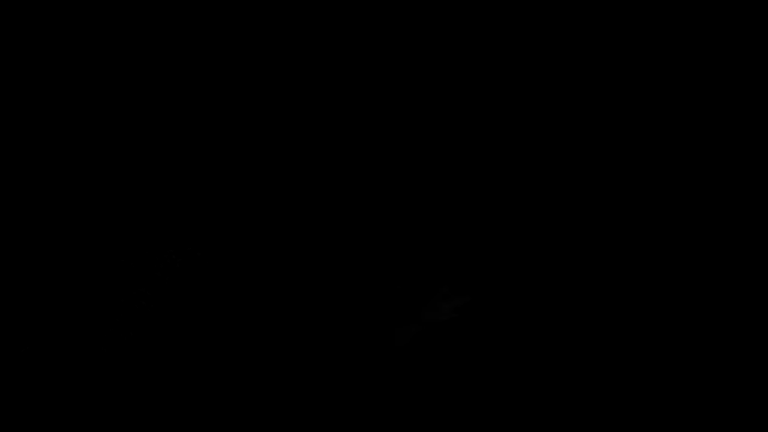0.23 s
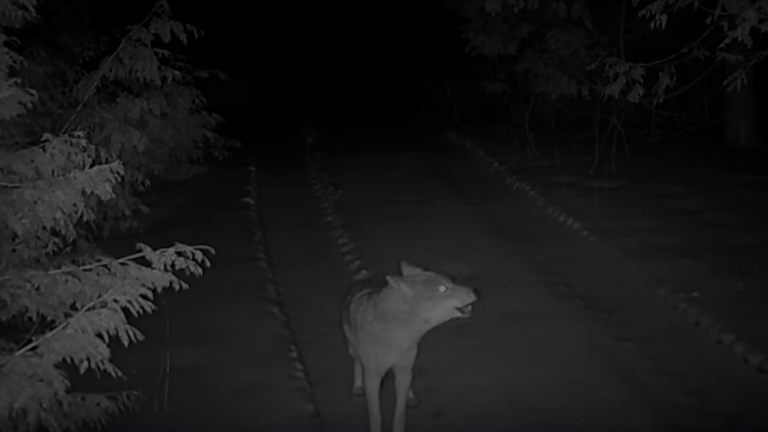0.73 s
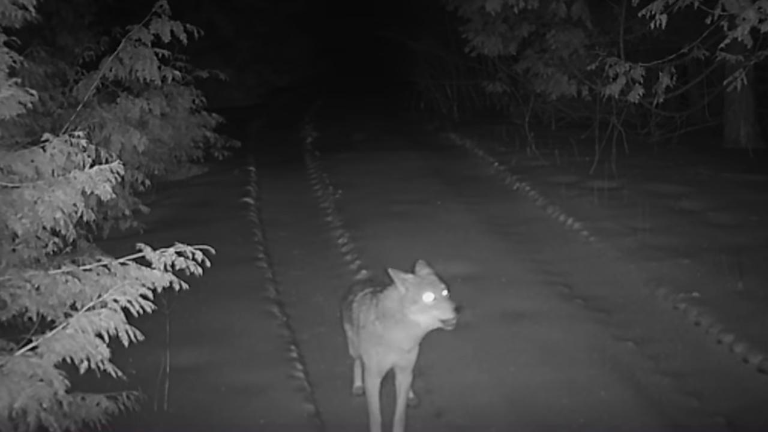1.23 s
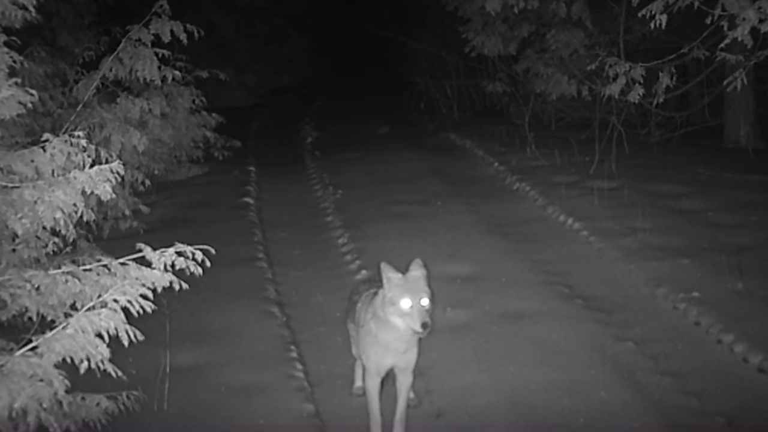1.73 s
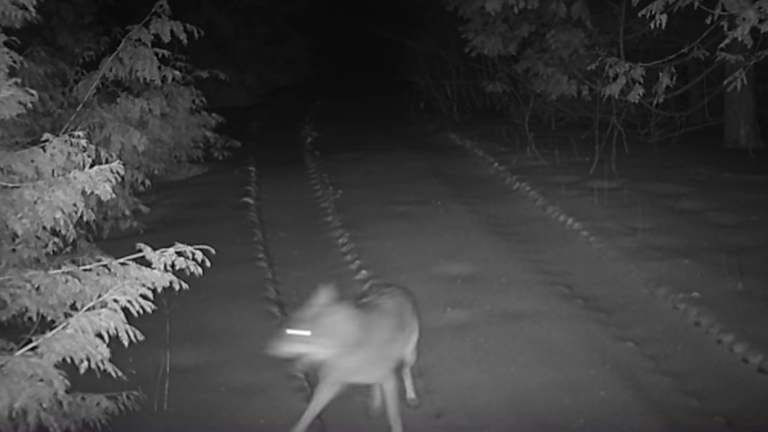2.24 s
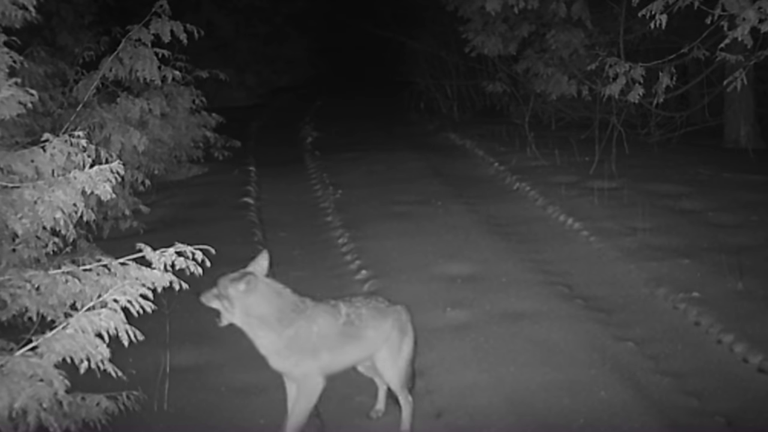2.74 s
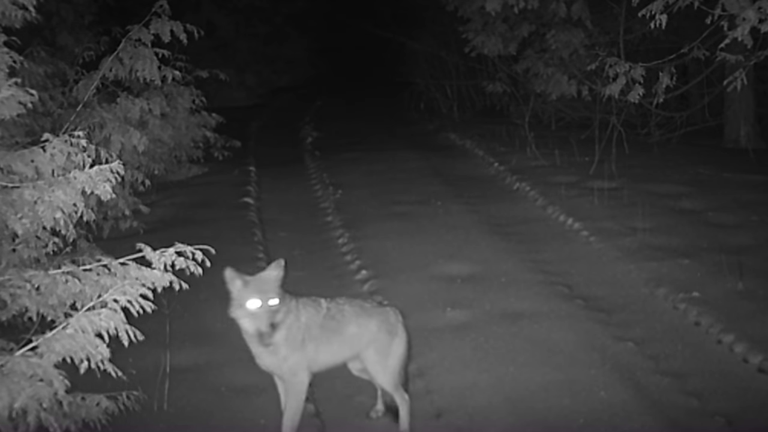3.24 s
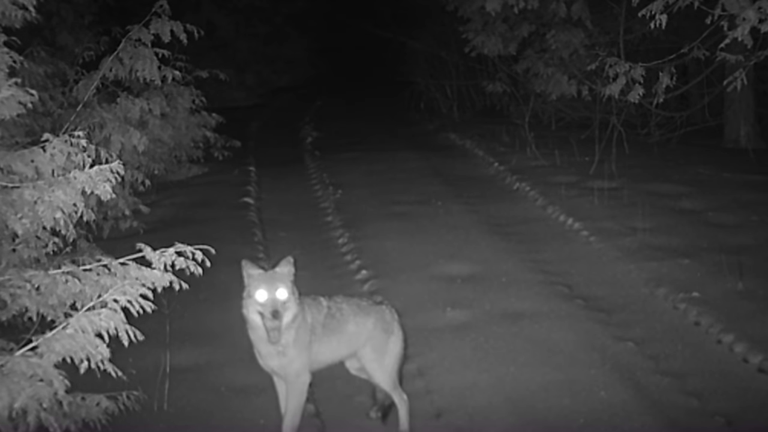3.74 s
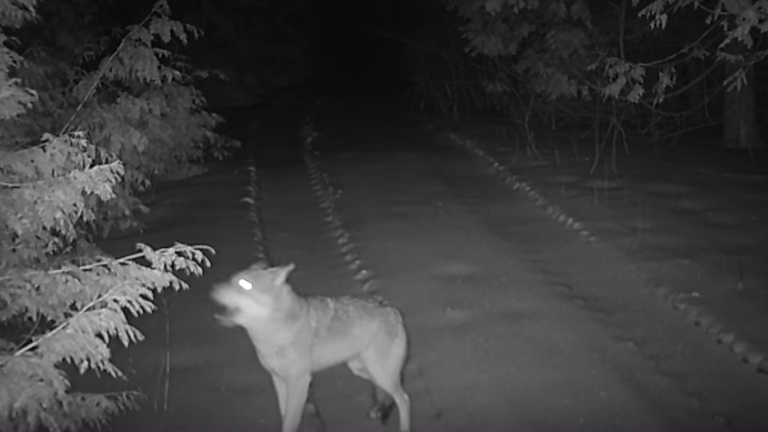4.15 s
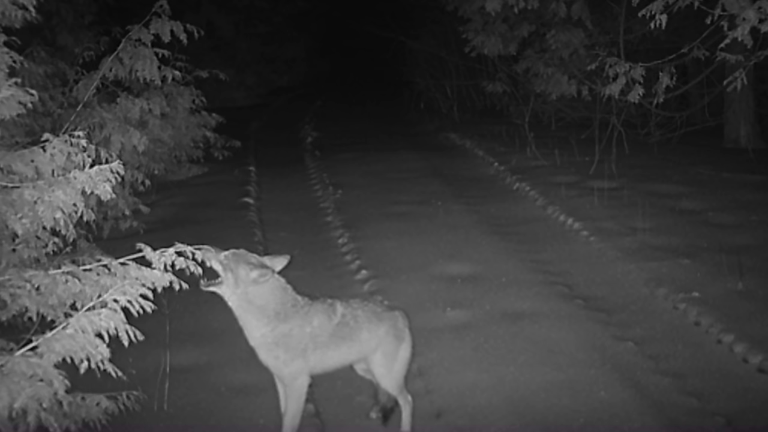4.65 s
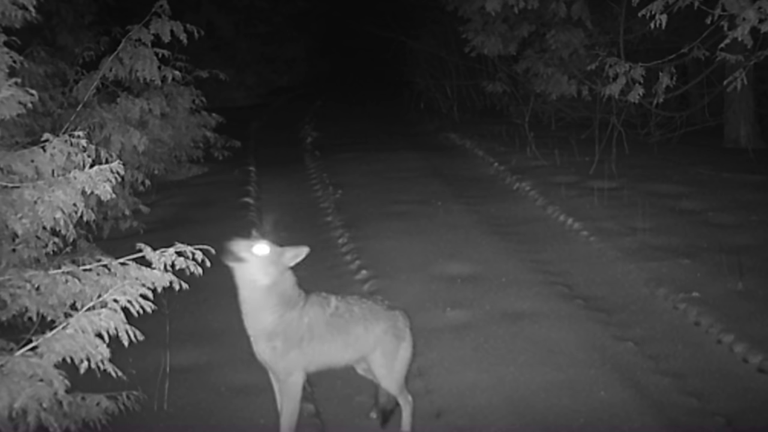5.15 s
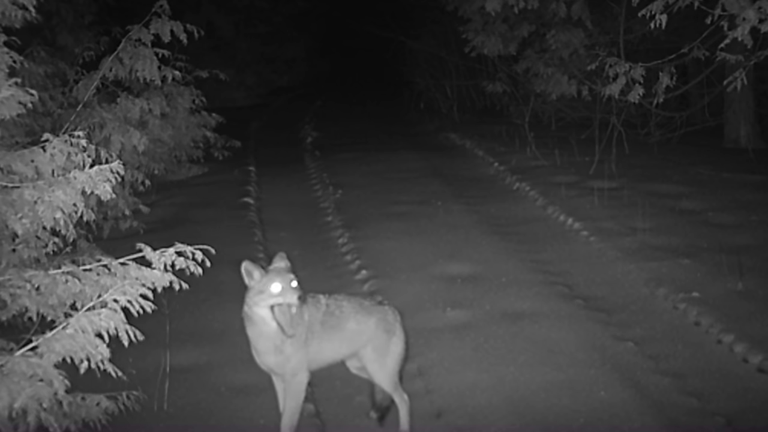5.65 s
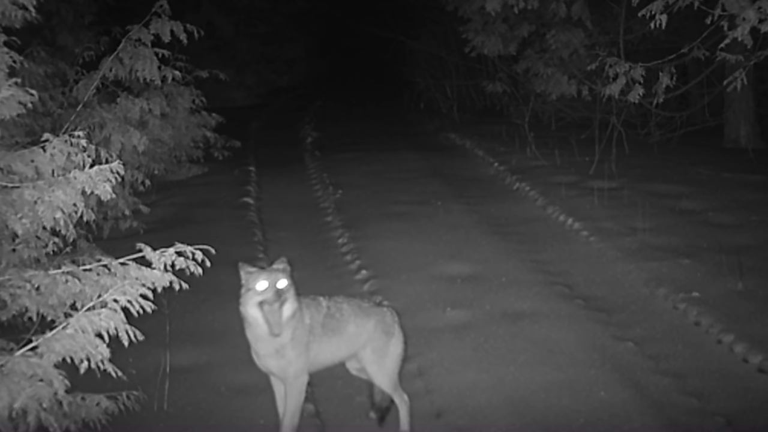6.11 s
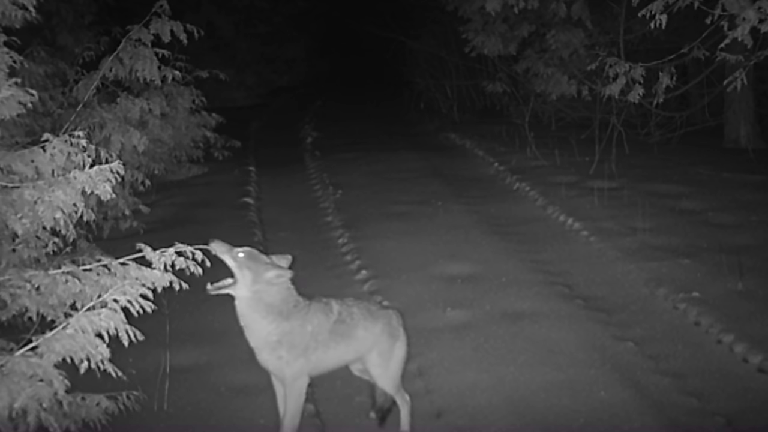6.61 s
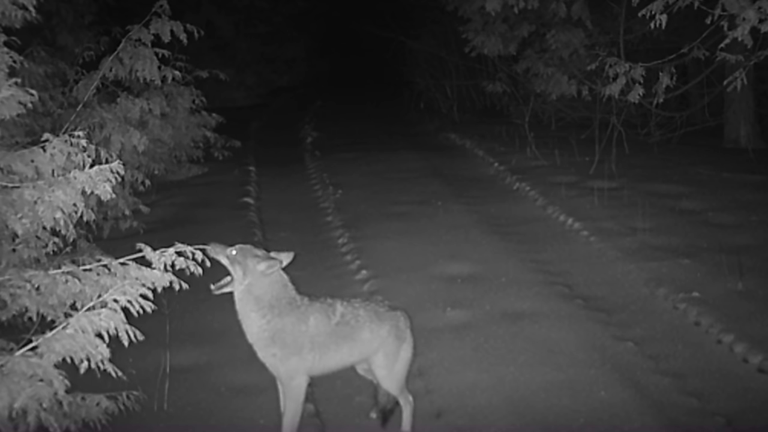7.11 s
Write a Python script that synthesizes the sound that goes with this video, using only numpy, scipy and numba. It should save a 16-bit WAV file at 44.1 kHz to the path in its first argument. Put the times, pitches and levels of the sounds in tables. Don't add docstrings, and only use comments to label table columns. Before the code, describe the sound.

Several coyotes call together outdoors, one only metres from a small bass-light microphone. Faint hiss and quiet moaning give way to long gliding howls and high whines, then yodels, sharp yips, a low bark and harsh shrieking cries that briefly distort. A hoarse far pack swells behind, trees scatter the voices briefly, and a few tiny dry twig ticks show between calls. The chorus is still loud at the close.

```python
import sys
import numpy as np
from scipy import signal
from scipy.fft import rfft, irfft, next_fast_len
from scipy.io import wavfile
from scipy.ndimage import uniform_filter1d
from numba import njit

SR = 44100
rng = np.random.default_rng(int(sys.argv[2]) if len(sys.argv) > 2 else 0)


def log_audio(samples):
    frames = np.atleast_2d(samples).T
    limited = np.clip(frames, -1, 1)
    pcm = np.round(limited * 32767).astype(np.int16)
    wavfile.write(sys.argv[1], SR, pcm)


def gain_from_db(level_db):
    decades = np.asarray(level_db, float) / 20
    return 10 ** decades


N = 325458


def level(x, db):
    return x * gain_from_db(db) / np.sqrt(np.mean(x ** 2))


def on_log(hz, table):
    table_hz, table_db = np.transpose(table)
    return np.interp(np.log(hz), np.log(table_hz), table_db)


def coloured(table):
    size = next_fast_len(N)
    hz = np.maximum(np.arange(size // 2 + 1) * SR / size, 1)
    spectrum = rfft(rng.standard_normal(size)) * gain_from_db(on_log(hz, table))
    return level(irfft(spectrum, size)[:N], 0)


def walk(rate_hz):
    k = int(SR / rate_hz)
    steps = np.repeat(rng.standard_normal(N // k + 1), k)
    return 1.5 * uniform_filter1d(uniform_filter1d(steps, k), k)[:N]


def rounded(curve, span):
    return uniform_filter1d(uniform_filter1d(curve, span, mode="nearest"), span, mode="nearest")


def glide(t, s, hz):
    rate = np.diff(hz) / np.diff(s)
    a, b = np.r_[rate[0], rate], np.r_[rate, rate[-1]]
    slope = np.where(a * b > 0, 2 * a * b / np.where(a + b == 0, 1, a + b), 0)
    i = np.clip(np.searchsorted(s, t) - 1, 0, len(s) - 2)
    h = np.diff(s)[i]
    u = np.clip((t - s[i]) / h, 0, 1)
    bend = (1 - u) * (slope[i] - rate[i]) - u * (slope[i + 1] - rate[i])
    return hz[i] + u * h * rate[i] + h * u * (1 - u) * bend


# (frequency [Hz], density [dB])
HISS = [(40, -55.5), (700, -30), (1320, -1), (3800, -32), (5500, -18.5), (9000, -44)]


def hiss():
    return gain_from_db(-87.5) * coloured(HISS)


# (frequency [Hz], level [dB])
BREATH = [(800, -34.5), (2300, -10.5), (3900, -19.5), (5600, -4.5), (7000, -12.5), (8500, -23.5),
          (15500, -33)]
# (time [s], level [dB])
FAR = [(0, -77), (.45, -58.5), (.7, -51), (1.0, -67.5), (1.9, -49.5), (2.599, -43.5), (3.2, -54),
       (4.3, -45), (5.3, -47), (6.1, -46), (6.701, -38.5), (7.38, -42.5)]


def far_pack():
    t = np.arange(N) / SR
    out = 0
    for hz in (890, 1040, 1242, 1286, 1310):
        wavering_hz = hz * (1 + 0.025 * walk(5) + 0.005 * walk(150))
        phase = 2 * np.pi * np.cumsum(wavering_hz) / SR
        late_db = np.interp(t, [3.5, 5, 6.4], [32, 11, 6]) * (hz < 1100)
        swell = gain_from_db(5 * walk(8) - late_db)
        voice = np.cos(phase) + gain_from_db(-6.5) * np.cos(2 * phase) + gain_from_db(-11.0) * np.cos(4 * phase)
        out = out + swell * voice
    out = level(out, 0) + gain_from_db(-12.0 + 6.1 * walk(9.2)) * coloured(BREATH)
    return out * gain_from_db(np.interp(t, *np.transpose(FAR)))


# (time [s], half length [s], rasp [0-1])
HOARSE = [
    (.51, .032, .31),
    (4.07, .025, .25),
    (4.163, .01, .15),
    (4.73, .03, .12),
    (7.08, .05, .06),
    (7.2, .04, .04),
    (5.13, .025, .2),
    (6.74, .015, .2),
    (6.93, .07, .12),
    (3.4, .012, .2),
]
# (frequency [Hz], level [dB])
MOUTH = [(500, -22), (1500, -1), (3000, -14), (4200, -16), (5600, 4), (7600, -15.5), (11000, -22.5),
         (15500, -37.5)]
# (time [s], half length [s], treble [dB])
MUZZLE = (5.91, 0.16, 7.9)
STEP = 32
TOP_HZ = 15700
GLIDE_RASP = .007
GLIDE_FADE_DB = 0.52
LOW_PATCH_SHARE = 0.36


def coyote(calls, third_db, bright_db, slope_db, rough, breath_db, dull_db=0., patchy_db=4.8, edge_s=.008):
    out, t = np.zeros(N), np.arange(N) / SR
    hoarse = rough + sum(r * np.exp(-((t - s) / w) ** 2) for s, w, r in HOARSE)
    tremor, flutter, patches = walk(60), walk(500), walk(24)[::STEP]
    air = coloured(BREATH) * gain_from_db(3.43 * walk(12))
    lift_s, lift_half_s, lift_peak_db = MUZZLE
    each, cycles = np.zeros(len(calls)), np.zeros(N)
    for call, throat_db, facing_db in zip(calls, third_db + each, bright_db + each):
        s, *columns = np.transpose(call)
        on = slice(int(s[0] * SR), min(int(s[-1] * SR), N))
        now = t[on]
        slow = now[::STEP]
        span = min(len(slow) // 9, 28)
        top_db, mouth_db = (rounded(np.interp(slow, s, c), span) for c in columns[1:])
        hz = glide(slow, s, columns[0])
        first_db = top_db - np.maximum(mouth_db, 0)
        second_db = top_db + np.minimum(mouth_db, 0)
        effort_db = (first_db + second_db) / 2
        low_db = [first_db, second_db, effort_db + throat_db]

        speed = np.abs(np.gradient(np.log(hz), slow))
        rasp = hoarse[on] + np.interp(now, slow, GLIDE_RASP * speed)
        shaken_hz = np.interp(now, slow, hz) * (1 + 0.0026 * tremor[on] + 0.1547 * rasp * flutter[on])
        cycles[on] = cycles[on.start] + np.cumsum(shaken_hz) / SR
        turn = np.exp(2j * np.pi * cycles[on])

        breath = np.interp(now, slow, gain_from_db(effort_db + breath_db + facing_db)) * air[on]
        stack = breath * (1 + 2.2 * rasp)
        lift_db = lift_peak_db * np.exp(-((slow - lift_s) / lift_half_s) ** 4)
        partial = 1
        for k in range(1, min(int(TOP_HZ / hz.min()), 18) + 1):
            patch_db = patchy_db * np.roll(patches, -301 * k - on.start // STEP)[:len(slow)]
            flicker_db = patch_db - GLIDE_FADE_DB * speed
            if k == 1:
                gain_db = first_db
            elif k <= 3:
                gain_db = low_db[k - 1] + LOW_PATCH_SHARE * flicker_db
            else:
                shape_db = on_log(k * hz, MOUTH) + slope_db * np.log2(k / 4)
                gain_db = effort_db + facing_db + lift_db / (1 + k % 2) + shape_db + flicker_db
            gain_db = gain_db - dull_db * np.maximum(np.log2(k * hz / 7000), 0)
            partial = partial * turn
            stack = stack + np.interp(now, slow, gain_from_db(gain_db) * (k * hz < TOP_HZ)) * partial.imag
        edge = np.clip(np.minimum(now - s[0], s[-1] - now) / edge_s, 0, 1)
        out[on] += np.sqrt(2) * stack * edge * (1 + rasp * flutter[on])
    return out


# (pitch [Hz], ratio [dB])
THROAT = [(450, 3.5), (650, 2), (850, 4), (1000, 2.5), (1300, -17.5), (1500, -12)]


def voiced(calls, mouth_db):
    shifts_db = mouth_db + np.zeros(len(calls))
    return [np.c_[c, on_log(np.array(c)[:, 1], THROAT) + m] for c, m in zip(calls, shifts_db)]


# (time [s], pitch [Hz], strongest harmonic [dB])
WHINER = [
    [(.62, 862, -55), (.66, 1086, -43), (.7, 1447, -35.5), (.74, 1390, -49.5), (.8, 1343, -56),
     (.84, 1305, -58)],
    [(.025, 923, -56), (.35, 910, -58), (.74, 814, -55.5), (.82, 752, -62)],
    [(.945, 1330, -51), (1.03, 1416, -48), (1.13, 1437, -46.5), (1.22, 1383, -45), (1.33, 1439, -43.5),
     (1.4, 1413, -50), (1.46, 1375, -53.5), (1.62, 1357, -48), (1.9, 1298, -49.5)],
    [(2.95, 900, -46.5), (3.02, 1032, -39), (3.15, 1035, -71)],
    [(3.545, 1140, -40.5), (3.61, 1345, -29.5), (3.68, 1288, -39), (3.78, 1374, -28.5), (3.83, 1325, -33),
     (3.865, 1160, -47)],
    [(3.82, 982, -37), (3.88, 1310, -40), (3.94, 1451, -38.5), (4.17, 1420, -57), (4.25, 1372, -43),
     (4.4, 1415, -42.5), (4.54, 1323, -46), (4.63, 1375, -45), (4.804, 1329, -32.5)],
    [(4.796, 1350, -41), (5.18, 1300, -34.5), (5.25, 1329, -37.5), (5.33, 1206, -43), (5.42, 1439, -23.5),
     (5.47, 1332, -32)],
    [(6.935, 1086, -41), (6.97, 1320, -27.5), (7.0, 1485, -24), (7.025, 1488, -28.5), (7.06, 1354, -40),
     (7.12, 1330, -44), (7.17, 1382, -31), (7.25, 1494, -36), (7.42, 1464, -34.5)],
]


def whiner():
    calls = voiced(WHINER, mouth_db=[5.5, -1.5, 7.0, -34, -2, 9.5, 1.5, 1.0])
    return coyote(calls, third_db=[-16, -14.0, -16.5, -17, -18, -22.0, -17.5, -22.0],
                  bright_db=[-11.0, -5.5, -8.5, -21, -12.5, -12, -19.5, -21.5],
                  slope_db=-9.5, rough=0.022, breath_db=-25.0)


# (time [s], pitch [Hz], strongest harmonic [dB])
MOANER = [
    [(.025, 485, -51), (.3, 494.4, -49.5), (1.49, 455.3, -61.5), (1.54, 553, -67)],
    [(2.1, 537, -54), (2.65, 537.4, -56)],
    [(3.98, 661.4, -40.5), (4.05, 877, -42.5), (4.1, 778, -33.5), (4.2, 684, -43.5), (4.27, 591, -39.5)],
    [(4.262, 597, -46), (4.36, 698, -46.5), (4.39, 816.4, -52.5), (4.45, 746, -41.5), (4.53, 731, -42),
     (4.58, 916, -41), (4.65, 810, -49)],
    [(5.075, 450.7, -40), (5.13, 639.5, -30.5), (5.17, 890, -22), (5.205, 970, -18.5)],
]


def moaner():
    calls = voiced(MOANER, mouth_db=[-20.0, -8.0, 2.5, 1, 10.5])
    return coyote(calls, third_db=[3.0, -2.5, -9, -17, -13.5], bright_db=[-11.0, -10.5, -12, -12.5, 1.0],
                  slope_db=-2.5, rough=0.024, breath_db=-16.0)


# (time [s], pitch [Hz], strongest harmonic [dB])
ANSWERS = [
    [(.13, 1142, -68), (.19, 1290, -52.5), (.23, 1430, -36), (.27, 1343, -42), (.29, 1150, -53),
     (.33, 777, -63)],
    [(.465, 319, -71), (.5, 429.4, -58), (.53, 503, -51), (.575, 508, -60)],
    [(.7, 1446, -64), (.73, 1494, -60), (.8, 1440, -53), (.84, 1414, -65), (.88, 1493, -59.5),
     (.96, 1430, -61), (1.06, 1435, -55)],
    [(.79, 672, -55), (.9, 646, -52), (1.05, 653, -51.5), (1.2, 660, -46)],
    [(4.155, 1434, -35), (4.17, 1420, -30), (4.195, 1294, -32.5), (4.22, 1330, -31), (4.265, 1333, -36.5),
     (4.31, 1310, -45)],
    [(4.41, 1159, -40.5), (4.445, 1301, -27.5), (4.5, 1315, -27), (4.55, 1260, -38), (4.575, 1240, -39),
     (4.595, 1090, -47)],
    [(4.76, 1203, -43), (4.82, 1270, -37.5), (4.95, 1220, -41.5), (5.02, 1150, -46), (5.075, 1040, -53)],
    [(5.675, 1072, -40), (5.71, 1250, -33), (5.745, 1330, -28.5), (5.8, 1247, -32), (5.87, 1120, -49),
     (5.92, 1025, -55)],
    [(5.99, 1192, -39.5), (6.02, 1360, -29.5), (6.07, 1290, -29), (6.11, 1185, -39), (6.14, 1070, -37.5)],
]
# (time [s], pitch [Hz], strongest harmonic [dB])
LATE_ANSWERS = [
    [(6.13, 997, -51), (6.17, 1110, -47), (6.25, 1159, -46.5), (6.31, 1196, -52.5)],
    [(6.35, 569, -52), (6.41, 668, -38), (6.47, 791, -34.5), (6.5, 809, -38), (6.53, 726, -50),
     (6.585, 445, -65)],
    [(6.655, 1189, -54), (6.68, 1265, -54), (6.77, 1291, -32), (6.79, 1216, -30), (6.89, 1217, -50),
     (6.95, 1280, -37)],
    [(6.89, 897, -39), (6.94, 867, -35), (6.99, 780, -44)],
    [(7.15, 391, -48), (7.17, 418, -36.5), (7.2, 430, -36.5), (7.235, 404, -40), (7.26, 396, -67)],
    [(7.2, 1074, -35), (7.25, 1053, -36.5), (7.29, 1183, -30.5), (7.34, 1207, -36.5), (7.42, 1250, -40)],
]


def answers():
    calls = voiced(ANSWERS + LATE_ANSWERS,
                   mouth_db=[0.5, 9, 6, 13, 11.5, 4, 3.5, 1, 2.5, 10, -1, 6, -5, 29.5, 5.0])
    return coyote(calls,
                  third_db=[-18, 8.5, -6.5, -8, -26, -25, -26, -12, -17, -21, -12, -22.5, -9, 1, -26],
                  bright_db=[-5.5, 5, 5.0, 0.5, -35, -20, -16, -24, -18.5, -11.0, -8.5, -16.5, -11.5, 23, -15],
                  slope_db=-15.5, rough=0.017, breath_db=-32.5)


# (time [s], pitch [Hz], strongest harmonic [dB], second over first harmonic [dB])
HOWLER = [
    [(.47, 301, -53, 3), (.52, 486, -65, 14), (.7, 546, -45, -3), (.87, 504, -55.5, 6.5),
     (1.0, 533.8, -46, 5.5), (1.12, 648, -43, 2), (1.2, 640, -36, -11), (1.3, 606.6, -38, -12.5),
     (1.364, 617, -39, 1)],
    [(1.356, 619, -38, -4), (1.43, 667, -32, -15), (1.5, 652.5, -35.5, -5.5), (1.62, 665, -37.5, -4),
     (1.7, 626.5, -34.5, -7), (1.81, 534.8, -39.5, -3.5), (2.004, 543.7, -34, 6.5)],
    [(1.996, 548, -33.5, 7), (2.2, 461.4, -44.5, -7), (2.47, 449.3, -46, -1.5), (2.66, 483.7, -41, -8),
     (2.8, 477.6, -40, 0.5), (2.9, 436, -43.5, 1.5), (2.96, 460, -45, 2)],
    [(2.955, 467, -48, -5), (3.0, 512, -36.5, -38), (3.23, 527, -35.5, -34.5), (3.38, 678.6, -43, -8),
     (3.5, 637.5, -47, -4), (3.67, 640.5, -48, 3), (3.92, 601, -42.5, -7), (4.08, 657.5, -44, 5),
     (4.15, 625, -46, 6), (4.22, 451, -48, 14)],
]
# (time [s], pitch [Hz], strongest harmonic [dB])
SINKING = [
    [(5.13, 907.5, -35), (5.16, 1146, -24), (5.19, 1274, -18), (5.245, 1345, -21.5), (5.325, 1034, -32),
     (5.38, 1115, -31), (5.45, 1354, -13.5), (5.5, 1256, -19.5), (5.558, 903, -32)],
    [(5.55, 898, -33), (5.58, 891, -31), (5.68, 956, -30.5), (5.78, 931, -31.5), (5.87, 822, -37.5),
     (6.01, 810, -45.5), (6.05, 640, -59), (6.14, 607.6, -48), (6.2, 676, -51), (6.3, 590, -57)],
]


def howler():
    calls = HOWLER + voiced(SINKING, mouth_db=[-3, -6])
    return coyote(calls, third_db=[-13.5, -7.5, -19.0, -4.0, -29, -26.0],
                  bright_db=[-23.5, -20, -27.5, -16.5, -23, -20.0],
                  slope_db=1.0, rough=0.002, breath_db=-16.5, dull_db=30)


def arcs(rows, from_share, to_share, fade_db, count=9):
    u = np.linspace(-1, 1, count)
    sag = np.where(u < 0, 1 - from_share, 1 - to_share) * u ** 2
    calls = []
    for s, rise_s, fall_s, hz, db in rows:
        times = s + u * np.where(u < 0, rise_s, fall_s)
        calls.append(np.c_[times, hz * (1 - sag), db - fade_db * np.abs(u) ** 1.3])
    return calls


# (peak time [s], rise [s], fall [s], peak pitch [Hz], peak level [dB])
YIPS = [
    (.89, 0.076, 0.13, 1422, -42.5),
    (3.0, .07, 0.045, 1325, -30.5),
    (3.18, .08, 0.1, 1355, -32.5),
    (3.35, .08, 0.064, 1378, -28.5),
    (6.35, 0.082, 0.066, 1274, -25.5),
    (6.545, 0.09, 0.045, 1306, -29.5),
    (6.765, 0.032, 0.04, 1390, -28.5),
    (6.67, 0.1, 0.093, 1162, -43.5),
]
# (peak time [s], rise [s], fall [s], peak pitch [Hz], peak level [dB])
WHOOPS = [
    (7.02, 0.024, 0.07, 1344, -30),
]


def yips_and_whoops():
    whoops = voiced(arcs(WHOOPS, from_share=.95, to_share=.78, fade_db=10), mouth_db=7.0)
    yips = voiced(arcs(YIPS, from_share=.88, to_share=.88, fade_db=16.5), mouth_db=-2.5)
    return coyote(whoops + yips, third_db=-22.5, bright_db=-19.0, slope_db=4.0, rough=0.014, breath_db=-23)


# (time [s], peak [dB])
TICKS = [
    (1.855, -57.5),
    (2.3211, -50),
    (2.597, -49.5),
    (3.209, -42.5),
    (3.3994, -52),
    (4.058, -48),
]


def twigs():
    t, decay_s = np.arange(N) / SR, .003
    burst = 0
    for s, db in TICKS:
        burst = burst + gain_from_db(db - 6) * np.exp(-np.maximum(t - s, 0) / decay_s) * (t >= s)
    return burst * coloured([(1500, -32), (5000, -2), (10000, 4), (15500, -4.5)])


# (time [s], pitch [Hz], strongest harmonic [dB], second over first harmonic [dB])
YODELS = [
    [(1.97, 1000, -42.5, 4), (2.02, 1400, -31, -19), (2.06, 1623, -40, -1), (2.1, 1646, -47, -5),
     (2.16, 1524, -25, -25.5), (2.22, 1658, -40.5, -4), (2.28, 1730, -29.5, -8.5), (2.335, 1634, -40, -13)],
    [(2.325, 1620, -46, -15), (2.43, 1185, -35.5, -25), (2.53, 1237, -38.5, -15), (2.62, 1151, -39, -25),
     (2.72, 1303, -40, -10.5), (2.8, 1015, -41.5, -6.5), (2.85, 938, -39, 11), (2.912, 801, -26.5, 8)],
    [(2.907, 929, -27.5, 23), (3.1, 799.5, -25, 20), (3.2, 809.4, -24, 29), (3.25, 787, -29, 15)],
    [(3.242, 761, -35.5, 1), (3.32, 790, -36, 7.5), (3.4, 914, -39.5, -9.5), (3.55, 950, -36.5, -14),
     (3.63, 1017, -44, -5), (3.7, 874, -35.5, 7.5), (3.82, 723, -40.5, 5.5), (3.86, 620, -40, -2)],
]
CRIES = [
    [(4.66, 323, -39, 22), (4.7, 610, -37.5, 10), (4.725, 849, -23, -12.5), (4.77, 1235, -26.5, -17)],
    [(4.76, 1369, -19, -38), (4.8, 1516, -29, -22.5), (4.88, 1369, -43.5, -24), (4.95, 1390, -26.5, -29),
     (5.0, 1612, -23, -18), (5.03, 1485, -23.5, -22), (5.1, 712, -50, 10)],
    [(5.205, 1582, -7.5, -11), (5.235, 1679, -9.5, -31.5), (5.25, 1715, -19.5, -4.5),
     (5.3, 1660, -23.5, -8), (5.36, 1714, -27, 0.5), (5.45, 1665, -23, -7.5)],
    [(5.442, 1669, -25.5, -9), (5.58, 1866, -26.5, 1.5), (5.7, 1692, -22.5, -5), (5.77, 1773, -25.5, 2.5),
     (5.85, 1661, -25.5, -1), (5.98, 1849, -19.5, -11), (6.01, 1859, -21, 8), (6.035, 1405, -23, -17.5)],
    [(6.23, 1249, -20.5, -17), (6.245, 1462, -20, -19), (6.262, 1662, -17, -12), (6.272, 1731, -11.5, -22),
     (6.292, 1792, -7.5, -26.5), (6.35, 1683, -12.5, -34.5), (6.395, 1546, -32.5, -22)],
    [(6.387, 1559, -31, -20), (6.445, 1492, -39.5, -18), (6.51, 1438, -30, -24), (6.56, 1348, -33, -19),
     (6.64, 1375, -33, -26), (6.71, 1282, -38, -24), (6.73, 1210, -56, -16)],
]
WAILS = [
    [(6.8, 372, -38, 15.5), (6.82, 413.4, -56.5, 6), (6.865, 763, -36.5, 0), (6.915, 1040, -23, -22),
     (6.985, 1105, -30.5, -8), (7.02, 992, -32, -12), (7.055, 908, -31, -14)],
    [(7.047, 922, -36, -8), (7.1, 946, -34.5, -10), (7.15, 1059, -28.5, -19), (7.19, 1310, -27, -33),
     (7.24, 1224, -28, -36), (7.27, 928, -34.5, -3), (7.31, 546, -65, -12)],
]
FACING_DB = [-10, -14, -7.5, -6.5, -20.5, -5.5, -8, -8.5, -3, -14, -14.5, -19.5]


def near_animal():
    voice = coyote(YODELS + CRIES + WAILS,
                   third_db=[-18.0, -17.0, -19.5, -5.0, -21, -24, -13.0, -18.5, -20.0, -15, -25.0, -24.0],
                   bright_db=FACING_DB, slope_db=-7.5, rough=0.014, breath_db=-17.5)
    return voice + whistle(CRIES[3])


# (time [s], pitch [Hz], strongest harmonic [dB])
BARKER = [
    [(6.7, 1041, -54), (6.73, 1084, -38), (6.755, 1140, -25.5)],
    [(4.06, 571, -43), (4.095, 626, -34), (4.13, 639.4, -30.5), (4.17, 648, -39.5), (4.2, 646, -51),
     (4.28, 635, -56)],
    [(5.8, 998, -46), (5.87, 1095, -41.5), (6.0, 944, -48.5), (6.13, 965, -47.5)],
]


def barker():
    calls = voiced(BARKER, mouth_db=[3, 9, -4])
    return coyote(calls, third_db=[-20, 7, -12], bright_db=[-12, 9, -12],
                  slope_db=-23.0, rough=0.043, breath_db=-41.0)


# (start [s], pitch ratio, level [dB], octave [dB], sideband depth [0-1])
WHISTLE = (5.6, 4.34, -36, -14, .35)


def whistle(cry):
    start, ratio, db, octave_db, depth = WHISTLE
    t, (s, hz) = np.arange(N) / SR, np.transpose(cry)[:2]
    phase = 2 * np.pi * np.cumsum(glide(t, s, hz) * (1 + .002 * walk(85))) / SR
    tone = np.sin(ratio * phase) + gain_from_db(octave_db) * np.sin(2 * ratio * phase)
    edge = np.clip(np.minimum(t - start, s[-1] - t) / 0.0047, 0, 1)
    size = gain_from_db(db + 4.0 * walk(15) - 3.5 * (t - start) / (s[-1] - start))
    return np.sqrt(2) * size * edge * tone * (1 + depth * np.cos(phase))


@njit
def trees(x, lags, gain, damp):
    line, soft, out = np.zeros((8, 8192)), np.zeros(8), np.zeros(len(x))
    for i in range(len(x)):
        total = 0.
        for k in range(8):
            soft[k] += (1 - damp) * (gain[k] * line[k, (i - lags[k]) & 8191] - soft[k])
            total += soft[k]
            out[i] += soft[k] * (1 - 2 * (k % 2))
        for k in range(8):
            line[k, i & 8191] = x[i] + soft[k] - total / 4
    return out


def wood_scatter(x):
    t60_s = 0.48
    lags = rng.integers(900, 4000, 8)
    return gain_from_db(-15.5) * trees(x, lags, gain_from_db(-60 * lags / SR / t60_s), 0.27)


def scene():
    far = far_pack()
    pack = whiner() + moaner() + answers() + howler() + yips_and_whoops() + barker()
    near = near_animal()
    wood = wood_scatter(gain_from_db(-7.5) * near + pack + gain_from_db(11.5) * far)
    return (near + pack + gain_from_db(-21.0) * far + wood + hiss() + twigs())[None]


def roll_off(x):
    return signal.sosfilt(signal.butter(12, 15760, fs=SR, output="sos"), x)


def record(dry):
    t = np.arange(N) / SR
    ceiling, knee = 0.35, 62
    x = signal.sosfilt(signal.butter(4, 400, "high", fs=SR, output="sos"), dry)
    rumble = signal.lfilter([1], [1, -.93], rng.standard_normal(N))
    wake = rumble * gain_from_db(-64) * np.clip(1 - t / 0.037, 0, 1)
    x = x * np.clip((t - .02) / .006, 0, 1) + wake + gain_from_db(-75.5) * rng.standard_normal(N)
    x = x / (1 + np.abs(x / ceiling) ** knee) ** (1 / knee)
    x = signal.sosfilt(signal.butter(1, 150, "high", fs=SR, output="sos"), x)
    return roll_off(x)


dry = scene()
out = record(dry)
log_audio(out)
```